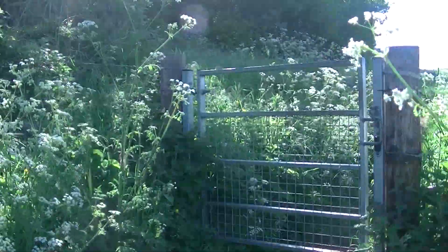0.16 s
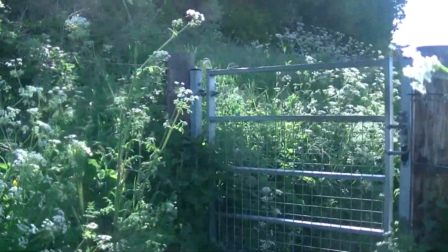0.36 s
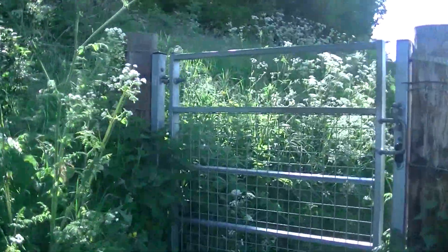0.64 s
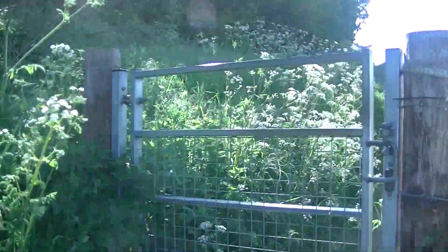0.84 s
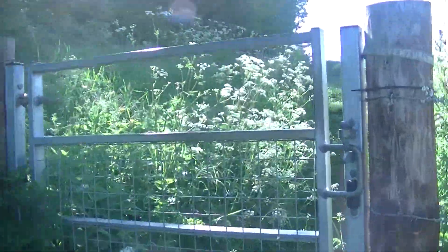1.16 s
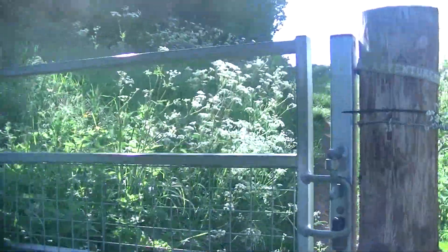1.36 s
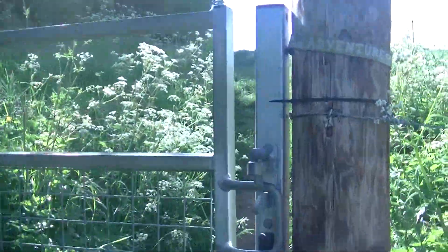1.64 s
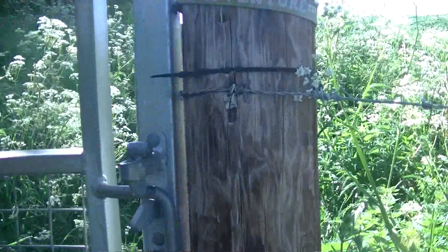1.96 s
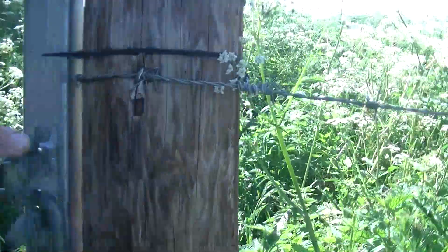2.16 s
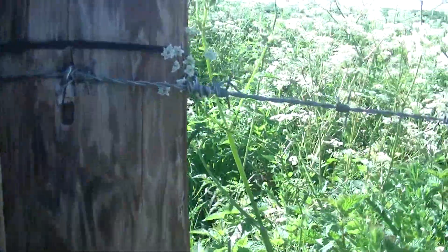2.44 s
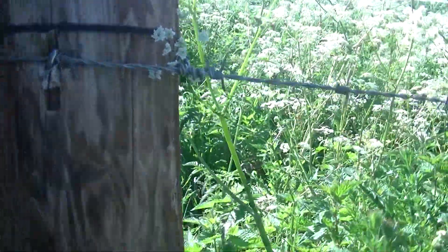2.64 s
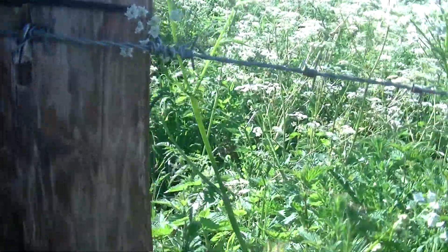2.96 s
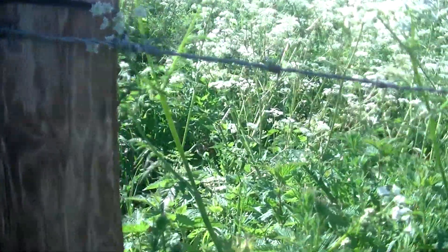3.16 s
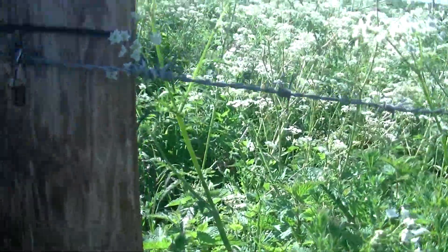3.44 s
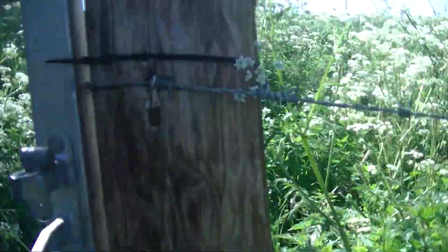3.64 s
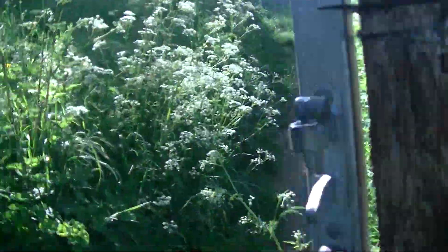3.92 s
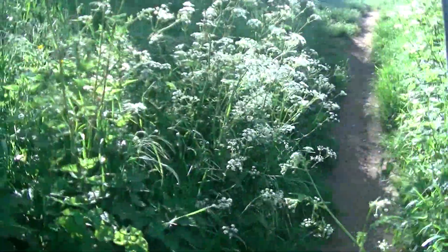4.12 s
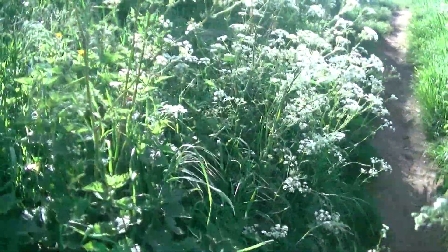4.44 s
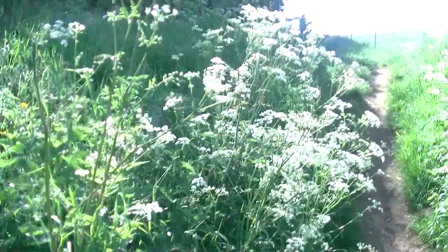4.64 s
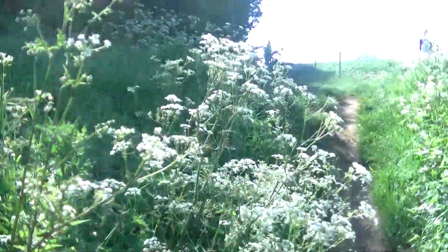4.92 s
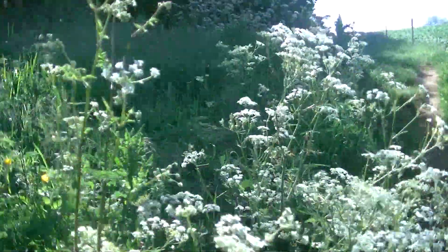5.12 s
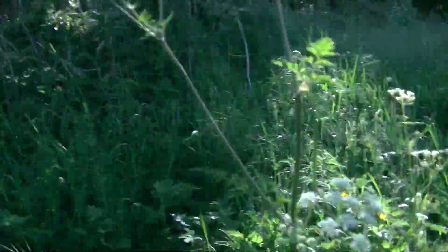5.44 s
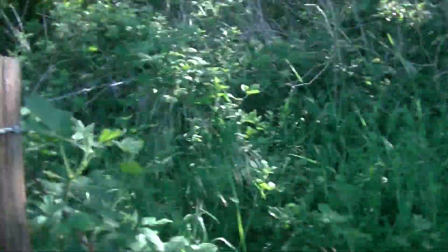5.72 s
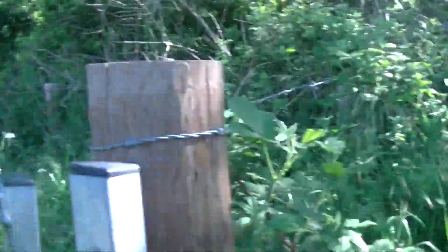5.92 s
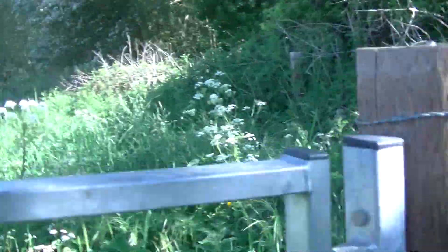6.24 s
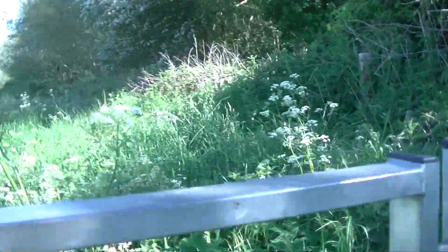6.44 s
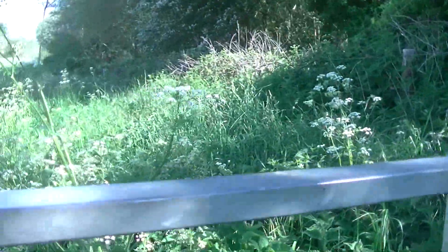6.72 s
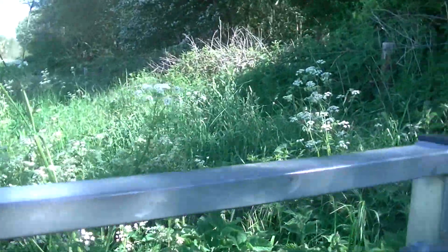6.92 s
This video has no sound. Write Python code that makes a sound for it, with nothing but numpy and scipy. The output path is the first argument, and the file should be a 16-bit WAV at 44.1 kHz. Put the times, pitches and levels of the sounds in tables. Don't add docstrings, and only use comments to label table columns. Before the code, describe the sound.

Open country air hisses softly, heard through a small, bass-thin microphone. From 0 to 2.3 seconds someone walks through tall weeds: grainy swishes with each stride, a few dry snaps around 0.9, brief far chirps from 1.0, a dull step and scuff at 2.1. At 2.34 to 2.44 bright, hard latch clinks strike close by, then lighter chatter around 2.6 and separate clinks at 2.9, 3.1 and 3.3, over blurred distant birdsong. A dense clinking flurry at 3.4 to 3.6 rattles the latch free. Swishing and dragging stalks continue from 3.65, with snaps near 4.8. Birds warble at 5.0 to 5.25, then trill louder at 5.5 to 5.85, echoing off the hedge; a twig cracks at 5.55. A dry hinge rubs at 6.0 to 6.3, heavy step at 6.4. The gate slams at 6.57, rebounds at 6.73 and 6.81, its steel mesh shivering and fading by about 7.1.

```python
import sys
import numpy as np
from scipy import signal
from scipy.fft import rfft, irfft
from scipy.io import wavfile
from scipy.ndimage import uniform_filter1d

SR = 44100
rng = np.random.default_rng(int(sys.argv[2]) if len(sys.argv) > 2 else 0)


def invert_db(level):
    return 10 ** (np.asarray(level, dtype=float) / 20)


def store_pcm(level_fs):
    pcm = np.round(np.clip(level_fs, -1, 1) * 32767).astype(np.int16)
    wavfile.write(sys.argv[1], SR, np.atleast_2d(pcm).T)


N = 312228


def evened(x):
    return x / np.sqrt(np.mean(x ** 2) + 1e-20)


def read(points, hz):
    f, value = np.transpose(points)
    return np.interp(np.log(hz + 1), np.log(f + 1), value)


def add(mix, s, sound):
    part = mix[..., round(s * SR):][..., :sound.shape[-1]]
    part += sound[..., :part.shape[-1]]


def octaves(hz):
    return np.log2(np.maximum(hz, 100) / 4000)


def wander(shape, width):
    return uniform_filter1d(rng.standard_normal(shape), width)


def coloured(x, db_of):
    return irfft(rfft(x) * invert_db(db_of(np.fft.rfftfreq(x.shape[-1], 1 / SR))), x.shape[-1])


def field(x, db_of):
    hz, t, z = signal.stft(x, SR, nperseg=256)
    return signal.istft(z * invert_db(db_of(hz[:, None], t)), SR, nperseg=256)[1][..., :x.shape[-1]]


def grains(per_s, spread_db, dense):
    size = invert_db(spread_db * np.minimum(rng.exponential(1, N), 4)) * (rng.random(N) < per_s / SR)
    return evened(size * rng.standard_normal(N)) + dense * rng.standard_normal(N)


def modes(length, share):
    bins = length // 2 + 1
    picked = (rng.random(bins) < share) * invert_db(3.7 * rng.standard_normal(bins))
    return evened(irfft(picked * np.exp(2j * np.pi * rng.random(bins)), length))


# frequency in Hz, coherence from 0 to 1.
LIKENESS = [(60, 0.135), (240, 0.05), (950, 0.55), (3770, 0.56), (15000, 0.035)]


def pair(x, other):
    same = np.clip(read(LIKENESS, np.fft.rfftfreq(N, 1 / SR)), 0, 1)
    return np.array([x, irfft(same * rfft(x) + np.sqrt(1 - same ** 2) * rfft(other), N)])


# frequency in Hz, left over right in dB.
BALANCE = [(60, 0), (180, 1), (550, 0.5), (1650, 0), (4970, 2.5), (15000, -1)]
# frequency in Hz, left lead in radians.
LEAD = [(0, -1.6), (3700, 0.2), (5170, 0.97), (9390, 1.57), (11300, 1.54), (12900, 0.41), (13900, 1.4),
        (16500, 0.8)]


def nearby(x):
    hz = np.fft.rfftfreq(N, 1 / SR)
    half = invert_db(read(BALANCE, hz) / 2) * np.exp(.5j * read(LEAD, hz))
    direct = irfft(rfft(x) * np.array([half, 1 / half]), N)
    t = np.arange(4410) / SR
    echo = rng.standard_normal((2, len(t))) * invert_db(-60 * t / 0.031) * (t > .0007)
    wet = signal.fftconvolve(x[None], echo / np.linalg.norm(echo[0]), axes=1)[:, :N]
    return direct + invert_db(-8.0) * coloured(wet, lambda f: 2.2 * octaves(f))


# frequency in Hz, density in dB per Hz.
AIR = [(18, -59), (30, -31), (181, -12), (455, -6.5), (1060, -9), (2740, -0.5), (3380, -0.5), (4410, -2.5),
       (11100, -15.5), (14100, -14), (15200, -17), (16500, -42)]


def air():
    patches = uniform_filter1d(rng.standard_normal((129, N // 128 + 2)), 4, 0)
    patches = evened(uniform_filter1d(patches, 20, 1))
    hiss = coloured(pair(*rng.standard_normal((2, N))), lambda hz: read(AIR, hz))
    whine = invert_db(-72.0) * np.sin(2 * np.pi * 7830 * np.arange(N) / SR)
    return invert_db(-55.5) * evened(field(hiss, lambda hz, t: 3.6 * patches[:, :len(t)])) + whine


# time in seconds, level in dB, centre in Hz.
CHORUS = [
    (2.3, -77, 4000),
    (2.55, -56, 3230),
    (2.85, -75, 3700),
    (3.16, -48.5, 3570),
    (3.35, -55, 3420),
    (3.592, -50, 3400),
    (3.9, -76, 3560),
]


def chorus():
    s, db, centre_hz = np.transpose(CHORUS)

    def shape(hz, t):
        off_centre = (hz - np.interp(t, s, centre_hz)) / 900
        return np.interp(t, s, db, -99, -99) + 12.5 - 12 * off_centre ** 2

    return field(rng.standard_normal((2, N)), shape)


# start in seconds, start in Hz, end in Hz, level in dB, length in seconds.
CHIRPS = [(0.987, 1650, 2480, -46, 0.02), (0.996, 2800, 2930, -44.5, 0.012), (1.03, 3130, 3900, -54, 0.025),
          (1.353, 3250, 4160, -51, 0.019), (1.38, 3250, 3000, -49, 0.013), (1.51, 3300, 4500, -49.5, .015),
          (1.535, 3020, 4050, -53, 0.027), (1.811, 2370, 3390, -48.5, .029), (1.84, 3500, 4450, -52, 0.019),
          (1.862, 4460, 4020, -55, .016), (1.945, 3250, 3050, -50, 0.015), (1.959, 2700, 2330, -52, 0.013),
          (1.997, 4150, 4250, -48, 0.013), (2.031, 3820, 4130, -53, .018), (2.05, 2890, 3260, -51, 0.024),
          (2.24, 3620, 4100, -52, .014), (3.27, 3550, 3300, -49, 0.032), (4.031, 2930, 2993, -46.5, 0.068),
          (4.04, 3620, 3820, -43, 0.018), (4.062, 4250, 3970, -46, .03), (4.1, 3900, 4620, -48, 0.022),
          (4.123, 4700, 3900, -50, 0.014), (4.707, 5700, 6550, -50, .029), (4.972, 5700, 6700, -50, 0.03),
          (5.213, 6700, 6830, -51, .025), (5.487, 4700, 5220, -44, .029), (5.842, 4400, 4400, -44.5, 0.031)]
# time of the top in seconds, top in Hz, level in dB, high voice in Hz, its level in dB.
WARBLE = [
    (4.99, 5450, -41.5, 6680, -48),
    (5.125, 5390, -45.5, 6960, -49),
    (5.244, 5770, -48, 6790, -49.5),
]
# start in seconds, low note in Hz, level in dB, upper note in Hz, its level in dB.
TRILL = [
    (5.507, 4490, -34.5, 4880, -50),
    (5.604, 4480, -38, 5080, -44),
    (5.692, 4520, -37, 4920, -45),
    (5.816, 4520, -38.5, 4740, -50),
]


def notes():
    rows = [(s, length, a_hz, b_hz, db) for s, a_hz, b_hz, db, length in CHIRPS]
    flick_s, high_s, sag_hz = 0.025, 0.037, 60.6
    for s, hz, db, high_hz, high_db in WARBLE:
        rows.append((s - flick_s, flick_s, hz - 347, hz, db - 2))
        rows.append((s, .04, hz, hz - 970, db))
        rows.append((s - flick_s / 2, high_s, high_hz, high_hz - 450, high_db))
    for s, hz, db, high_hz, high_db in TRILL:
        rows.append((s, 0.026, hz + sag_hz, hz - sag_hz, db))
        rows.append((s, 0.076, high_hz + sag_hz, high_hz - sag_hz, high_db))
    return rows


def birds():
    calls = np.zeros(N)
    for s, length, start_hz, end_hz, db in notes():
        u = np.linspace(0, 1, round(length * SR))
        hz = (start_hz + (end_hz - start_hz) * u) * (1 + 0.2 * wander(4410, 90)[:len(u)])
        whistle = np.sin(2 * np.pi * np.cumsum(hz) / SR)
        add(calls, s, invert_db(db - 1.5) * np.sin(np.pi * u) ** 0.22 * whistle)
    t = np.arange(SR // 2) / SR
    hedge = rng.standard_normal((2, len(t))) * invert_db(-60 * t / 0.85) * (t > .008)
    echoes = signal.fftconvolve(calls[None], hedge / np.linalg.norm(hedge[0]), axes=1)[:, :N]
    return invert_db(2.5) * calls + invert_db(0.5) * echoes


# frequency in Hz, density in dB per Hz.
WEEDS = [(35, -69), (60, -39), (412, -6.5), (1080, -15), (2190, 0.5), (4030, -4.5), (7250, -8.5),
         (9170, -17), (14000, -16.5), (15400, -22), (16500, -31.5)]
# start in seconds, end in seconds, level in dB.
WALKING = [
    (0, 2.6, -58.5),
    (3.63, 3.95, -53.5),
    (3.951, 5.68, -52.5),
    (5.68, 7.2, -58),
]
# time in seconds, peak in dB.
STRIDES = [(.21, -49), (.46, -43.5), (.53, -49.5), (.75, -48.5), (1.0, -44.5), (1.2, -48.5), (1.3, -47.5),
           (1.55, -51.5), (1.74, -57), (1.84, -54), (2.191, -61), (2.271, -47.5), (4.99, -49.5),
           (5.46, -51), (5.6, -44)]


def walk():
    swish = pair(grains(2500, 2.7, 1.0), grains(2500, 1.9, 0.51))
    swish = evened(coloured(swish, lambda hz: read(WEEDS, hz)))

    def shape(hz, t):
        power = sum(invert_db(2 * db) * ((t >= a) & (t < b)) for a, b, db in WALKING) + 1e-12
        for s, db in STRIDES:
            db_per_s = np.where(t < s, 139, 197)
            power = power + invert_db(2 * (db - db_per_s * abs(t - s)))
        return 10 * np.log10(power)

    return field(swish, shape)


def snap(db, hz, length):
    t = np.arange(2048) / SR
    burst = coloured(rng.standard_normal(len(t)),
                     lambda f: np.where(f < hz, -16., -8.) * np.log2((f + 5) / hz) ** 2)
    return invert_db(db - 6.5 - 20 * t / length) * evened(burst) * np.minimum(t * hz / 0.98, 1)


def scuff(length, db, hz, treble_db):
    def colour(f):
        hump = np.where(f < hz, -3.5, -5.5) * np.log2((f + 50) / hz) ** 2
        return np.maximum(hump, treble_db - 40 * (f < 250))

    grit = evened(coloured(grains(2000, 2.8, 1.0)[:8192], colour))
    grit = grit * invert_db(27 * wander(8192, 300))
    n = round(length * SR)
    return invert_db(db) * grit[:n] * signal.windows.tukey(n, .2)


# time in seconds, peak in dB, colour in Hz.
SNAPS = [(0.369, -37.5, 3620), (0.73, -35.5, 1600), (0.87, -27, 3500), (0.891, -34, 3450),
         (0.921, -29, 3630), (0.959, -35, 4000), (1.187, -33.5, 2410), (3.739, -36.5, 2470),
         (4.022, -31, 2270), (4.971, -33, 5000), (4.302, -41, 2580), (4.8, -30, 3600), (1.668, -40, 3650),
         (2.135, -28.5, 7060), (2.178, -41.5, 7040), (6.389, -29, 1940), (6.412, -29, 2380),
         (6.421, -20.5, 2170), (6.445, -32, 2500), (4.755, -33, 3960), (4.868, -37, 4300),
         (6.518, -38.5, 3480), (6.537, -41, 3170)]
# time in seconds, peak in dB, colour in Hz, length in seconds.
TWIG = [
    (5.55, -14.5, 2500, 0.0053),
    (5.552, -21, 6800, 0.0045),
]
# time in seconds, peak in dB, colour in Hz.
THUDS = [
    (.687, -44, 450),
    (.96, -48, 140),
    (1.125, -39, 455),
    (4.972, -36.5, 340),
    (5.549, -31, 650),
    (5.83, -45.5, 450),
    (2.128, -33, 404),
    (6.404, -28, 440),
]
# start in seconds, length in seconds, level in dB, colour in Hz, treble in dB.
SCUFFS = [(0.909, 0.03, -47, 3600, -11), (1.665, 0.054, -44, 2170, -17), (2.127, 0.033, -35.5, 2510, -12.5),
          (2.156, 0.017, -48, 2600, -17), (4.021, 0.1, -53, 3520, -27), (4.291, 0.056, -42, 2780, -13),
          (4.478, 0.051, -44.5, 3330, -21), (4.736, 0.15, -39.5, 3600, -15),
          (5.027, 0.051, -50.5, 2070, -16), (5.148, 0.11, -50, 2110, -20), (5.358, 0.061, -44, 3600, -12),
          (6.381, 0.075, -34.5, 2630, -16)]


def footing():
    ground = np.zeros(N)
    for s, db, hz in SNAPS:
        add(ground, s, snap(db, hz, 0.024))
    for s, *row in TWIG:
        add(ground, s, snap(*row))
    for s, db, hz in THUDS:
        add(ground, s, snap(db, hz, 6.5 / hz))
    for s, *row in SCUFFS:
        add(ground, s, scuff(*row))
    return ground


# time in seconds, level in dB.
SWING = [
    (5.949, -67.5),
    (6.101, -36),
    (6.228, -37.5),
    (6.33, -73),
]
# frequency in Hz, width in Hz, level in dB.
HINGE = [(2880, 180, -8), (7500, 34, 3), (9230, 39, -7), (11200, 32, -11), (13100, 35, -4), (14100, 55, -9),
         (15300, 34, -6)]
# frequency in Hz, density in dB per Hz.
GRIT = [(590, -61), (1000, -68), (2710, -5.5), (4700, -12), (12300, -8.5), (15600, -22), (16500, -31)]


def hinge():
    s, db = np.transpose(SWING)
    t = np.arange(s[0], s[-1], 1 / SR)
    hz = np.fft.rfftfreq(len(t), 1 / SR)
    peaks = sum(invert_db(d) / (1 + 2j * (hz - f) / (2.0 * w)) for f, w, d in HINGE)
    rub = irfft(rfft(grains(4800, 1.1, 1.3)[:len(t)]) * (peaks + invert_db(-1.5 + read(GRIT, hz))), len(t))
    return s[0], invert_db(np.interp(t, s, db) - 1.0) * evened(rub) * signal.windows.tukey(len(t), .2)


# time in seconds, level in dB, brightness in dB per octave.
RATTLE = [
    [(2.62, -38, -3), (2.646, -43, 0), (2.69, -39, 3)],
    [(3.5, -31, 23), (3.614, -25, -5.5), (3.66, -59, -12)],
]


def rattle(rows):
    s, db, bright_db = np.transpose(rows)
    length = round((s[-1] - s[0]) * SR)
    drive = 0.86 * grains(930, 1.8, 1.4)[:length] + modes(length, 0.16)
    body = evened(coloured(drive, lambda hz: read(CRACK, hz))) * signal.windows.tukey(length, .05)

    def shape(hz, t):
        tilt = np.interp(t + s[0], s, bright_db - 4.5)
        return np.interp(t + s[0], s, db - 6.0) + tilt * octaves(hz)

    return s[0], field(body, shape)


# start in seconds, caught in seconds, low mode at start in dB,
# low mode at catch in dB, upper modes in dB.
FREE = [
    (3.374, 3.392, -8, -35, -24.5),
    (3.414, 3.49, -22.5, -13, -32.5),
    (3.497, 3.585, -29, -23.5, -21.5),
    (6.749, 6.878, -29.5, -40, -45),
]
# frequency in Hz, level in dB, T60 in seconds, heard from in seconds.
UPPER = [(11333, 0, .35, 0), (13887, -8, .6, 3.45), (15335, -5, 1.0, 0)]


def free_bar(start, caught, low_db, caught_db, upper_db):
    catch_t60, free = 0.11, caught - start
    t = np.arange(0, free + catch_t60, 1 / SR)
    lines = invert_db(low_db + (caught_db - low_db) * np.minimum(t / free, 1)) * np.sin(2 * np.pi * 6607 * t)
    knock = min(row[0] for row in CLINKS + SLAMS if row[0] > caught) - start
    lines = lines * invert_db(-60 * np.maximum(t - knock, 0) / 0.029)
    for hz, db, t60, from_s in UPPER:
        if start > from_s:
            lines = lines + invert_db(upper_db + db - 60 * t / t60) * np.sin(2 * np.pi * hz * t)
    damped = lines * invert_db(-60 * np.maximum(t - free, 0) / catch_t60)
    return start, np.sqrt(2) * damped * np.minimum(t / 0.0013, 1)


# time in seconds, mesh in dB, brightness in dB per octave, tubes in dB.
SHIVER = [
    (6.5681, -11.5, -0.5, -5),
    (6.62, -15.5, 0.5, 1.5),
    (6.71, -14, -2, -8),
    (6.761, -18.5, -0.5, -13),
    (6.85, -23.5, -3.5, 0),
    (6.93, -33, -7, -11),
    (7.08, -45, -11.5, -1),
]
# frequency in Hz, density in dB per Hz.
MESH = [(35, -82), (60, -86), (326, -34), (393, -51), (983, -31.5), (1470, -26.5), (2350, -16.5),
        (3040, -1.5), (4640, -18), (4980, -10), (12700, -29.5), (14700, -29), (16500, -69)]
# frequency in Hz, level in dB.
TUBES = [(2708, -37), (2853, -34), (2977, -25), (3031, -28), (3085, -31), (3171, -31), (3644, -37),
         (3898, -37), (4016, -37), (4188, -43), (4888, -36), (5125, -42), (5787, -48), (6218, -46),
         (7154, -45), (7520, -49)]
# frequency in Hz, level in dB.
RAILS = [(1981, -55), (2277, -52), (2509, -56), (2616, -48), (3025, -50), (3978, -59), (4888, -58),
         (5421, -53), (5669, -61), (6632, -61)]


def shiver():
    s, mesh_db, bright_db, tubes_db = np.transpose(SHIVER)
    t = np.arange(s[0], N / SR, 1 / SR)
    wavering = invert_db(18 * uniform_filter1d(wander(len(t), 300), 300))
    mesh = (modes(len(t), 0.13) + 0.55 * grains(1500, 1.2, 0.61)[:len(t)]) * wavering
    mesh = evened(coloured(mesh, lambda hz: read(MESH, hz)))

    def shape(hz, u):
        return np.interp(u + s[0], s, mesh_db - 4.5) + np.interp(u + s[0], s, bright_db) * octaves(hz)

    out = field(mesh, shape)
    tubes_lift_db = np.interp(t, s, tubes_db) + 17.0
    rails_lift_db = np.where(t < 6.729, 21, 33)
    for lines, lift_db in (TUBES, tubes_lift_db), (RAILS, rails_lift_db):
        hz, db = np.transpose(lines)[:, :, None]
        db = db + 110 * wander((len(hz), len(t)), 1200)
        tones = invert_db(db + 2.0) * np.sin(2 * np.pi * (hz * t + rng.random(hz.shape)))
        out = out + tones.sum(0) * invert_db(np.interp(t, s, mesh_db) + lift_db)
    return s[0], out * np.minimum((t - s[0]) / 0.0016, 1)


def ring(hz, db, t60, free):
    t = np.arange(0, min(free + .07, .4), 1 / SR)
    decay_db = db - 60 * t / t60 - 60 * np.maximum(t - free, 0) / .07
    decay_db = decay_db + 40 * wander((len(hz), 4420), 75).repeat(4, 1)[:, :len(t)]
    tones = invert_db(decay_db) * np.sin(2 * np.pi * (hz * t + rng.random(hz.shape)))
    return tones.sum(0) * np.minimum(t / 0.0016, 1)


# frequency in Hz, level in dB, T60 in seconds.
BAR = [(6580, 3, 0.038), (8460, -3, 0.042), (10600, -14, 0.069), (11900, -32, 0.1), (12100, -19, 0.099),
       (15100, -15, 0.09)]
KEEPER = [(1561, -13.5, 0.071), (2735, -0.5, 0.13), (2870, -17, 0.13), (2925, -4.5, 0.044),
          (4355, -15, 0.057), (5260, -9.5, 0.051), (6400, -6, 0.06)]
FRAME = [(976, -24, 0.35), (1560, -9, 0.27), (2008, -1.5, 0.19), (2283, -6.5, 0.3), (3230, -5, 0.33),
         (3300, -4.5, 0.38), (4130, -16, 0.23), (5331, 2.5, 0.25)]
PLATE = [(2720, -15, 0.26), (2980, -8.5, 0.23), (3045, -9, 0.17), (3225, -13, 0.097), (3830, -15, 0.066),
         (3846, -16, 0.14), (4040, -3.5, 0.092), (4215, -1, 0.059), (4340, 1.5, 0.04), (5000, -9, 0.11),
         (5120, -2, 0.11)]
# time in seconds, then bar, keeper, frame and plate in dB.
STRIKES = [(2.344, -16, -38, -27, -23), (2.361, -24, -20.5, -35, -28.5), (2.391, -48, -26, -54, -39),
           (2.438, -36, -37, -42.5, -25.5), (2.696, -63, -26.5, -45, -53), (2.94, -51, -25, -58, -40),
           (3.117, -23.5, -46, -43, -24.5), (3.317, -42, -23.5, -55, -35), (3.374, -28, -52, -33, -22.5),
           (3.4, -13, -35, -28.5, -24), (3.494, -18.5, -40, -24, -28), (3.541, -24, -51, -25.5, -38),
           (6.729, -47, -49, -27, -26), (6.851, -60, -59.5, -35, -48), (6.91, -60, -62, -39.5, -46)]
SETTLES_S = [3.62, 6.95]
# time in seconds, frequency in Hz, level in dB, T60 in seconds.
LINGER = [(2.621, 1478, -41, 0.28), (2.62, 3020, -40, 0.26), (2.654, 6800, -31.5, .05),
          (2.439, 3225, -16, 0.056), (2.44, 1456, -38.5, .14), (2.45, 2062, -33, .07),
          (2.441, 5160, -37, 0.15), (2.44, 6480, -25, 0.056), (2.532, 2020, -46, 0.07),
          (2.94, 1561, -36, .14), (3.119, 1561, -38, 0.15), (3.118, 2283, -40, 0.11),
          (3.317, 3430, -38, .1), (3.317, 4355, -14.5, 0.049), (3.401, 1946, -31.5, .3),
          (3.401, 4000, -39, .5), (3.405, 885, -49, .15), (3.408, 3386, -19, .09), (3.541, 10300, -33, 0.2),
          (3.585, 3323, -32, 0.21), (3.64, 3290, -47.5, 0.55), (2.364, 2887, -18.5, 0.059),
          (2.696, 2690, -19, 0.043), (3.691, 2870, -46, 0.17), (6.57, 4900, -27.5, 0.36),
          (6.57, 5640, -26, .12), (6.57, 9500, -21.5, 0.16), (6.611, 2990, -17, 0.2),
          (6.612, 3160, -16, 0.27), (6.6, 1340, -38.5, .77), (6.64, 987, -44.5, 1.3),
          (6.599, 332.6, -59.5, 2.1), (6.739, 5320, -28, 0.34), (6.601, 1604, -44, 1.2),
          (6.6, 1960, -38, 1.2), (6.6, 2220, -46, 0.89), (3.1187, 6580, -17, 0.026),
          (6.73, 5150, -18, 0.082), (6.73, 870, -47, 0.42), (6.73, 593, -48, 0.38), (6.74, 2283, -28, 0.2),
          (6.74, 1950, -40, 0.48), (6.741, 1583, -45, 0.13), (6.765, 6480, -22, 0.068),
          (6.812, 3140, -13, 0.061), (6.85, 2090, -26, 0.077), (6.885, 2130, -29, 0.056),
          (6.911, 2030, -31, 0.1), (6.911, 5400, -29, 0.079)]


def rings():
    out, contacts = np.zeros(N), np.append(np.transpose(STRIKES)[0], SETTLES_S)
    hz, db, t60 = np.transpose(BAR + KEEPER + FRAME + PLATE)[:, :, None]
    part = np.repeat(np.arange(4), [len(BAR), len(KEEPER), len(FRAME), len(PLATE)])
    for s, *levels_db in STRIKES:
        held = 0.52 if s < 3.45 else 1
        lasts = t60 * np.array([1, 1, held, 1])[part, None]
        struck_db = db + np.array(levels_db)[part, None] + 3.5 * rng.standard_normal(hz.shape)
        add(out, s, ring(hz, struck_db, lasts, contacts[contacts > s].min() - s))
    for s, f, level_db, lasts in LINGER:
        add(out, s, ring(np.array([[f]]), level_db, lasts, lasts / 2))
    return out


# frequency in Hz, density in dB per Hz.
CRACK = [(35, -59.5), (60, -95), (1190, -34), (2040, -5.5), (2400, -8), (3260, 3), (5870, -10), (6450, 1),
         (8960, -16), (10800, -9), (13000, -30), (15400, -20), (16500, -49)]


def blow(db, smear_db, t60, bright_db):
    def dull(hz):
        return read(CRACK, hz) + min(bright_db, 0) * octaves(hz) - 9 * np.maximum(octaves(hz), 0)

    t = np.arange(8192) / SR
    tick = coloured(rng.standard_normal(len(t)), lambda hz: read(CRACK, hz) + bright_db * octaves(hz))
    smear = invert_db(smear_db - 60 * t / t60) * evened(coloured(modes(len(t), 0.12), dull))
    spray = invert_db(smear_db - 0.5 - 60 * t / (0.11 * t60))
    sharp = (invert_db(-6.0 - 60 * t / 0.012) + spray) * evened(tick)
    return invert_db(db) * (sharp + smear) * np.minimum(t / 0.00036, 1)


# time in seconds, peak in dB, smear in dB, smear T60 in seconds, brightness in dB per octave.
CLINKS = [(2.3425, -4, -11, 0.076, 6), (2.362, -6.5, -5.5, 0.023, -4), (2.3904, -18, -6, 0.039, -7),
          (2.4385, 1, -18.5, 0.064, 8), (2.6226, -27, -12.5, 0.11, -7.5), (2.6541, -36, -5.5, 0.36, -3),
          (2.6952, -22.5, 1, 0.034, -11.5), (2.8985, -31, -3.5, 0.064, -12.5),
          (2.941, -17, -5.5, 0.045, -14), (3.117, 2, -19.5, 0.094, 3), (3.316, -8.5, -7.5, 0.043, -8.5),
          (3.374, -9, -13, 0.044, 10), (3.3962, -8, -6, 0.035, 7), (3.3999, -2, -10.5, 0.047, 2),
          (3.4059, -6, -5, 0.044, 1), (3.41, -11, -8.5, 0.06, -1), (3.4947, -2.5, -8.5, 0.048, 13),
          (3.522, -15, -12, 0.05, -8), (3.54, -10.5, -10.5, 0.11, -4), (3.554, -16, -9, 0.05, -5),
          (3.583, -16, -8, 0.05, -4), (2.481, -33, -9, 0.05, -11), (2.561, -36.5, -9, 0.057, -14),
          (2.736, -36.5, -6, 0.04, -6)]
SLAMS = [(6.5683, 2, -8, 0.034, 5.5), (6.612, -14, -25, 0.074, 10), (6.6172, -17, -29, 0.05, -6),
         (6.6215, -19, -30, 0.05, 0), (6.628, -12, -13, 0.056, -8), (6.6573, -11, -20, 0.05, -6),
         (6.659, -18, -8, 0.24, -3), (6.725, -2, -11, 0.032, 0.5), (6.7285, -1.5, -10.5, 0.048, -2),
         (6.813, -6, -13.5, 0.054, -2), (6.8523, -19, -29, 0.052, -9), (6.91, -20.5, -10, 0.19, -4.5)]


def gate():
    steel = np.zeros(N)
    for s, *row in CLINKS + SLAMS:
        add(steel, s, blow(*row))
    for row in FREE:
        add(steel, *free_bar(*row))
    for rows in RATTLE:
        add(steel, *rattle(rows))
    add(steel, *shiver())
    add(steel, *hinge())
    steel = signal.lfilter(*signal.butter(3, 800, "high", fs=SR), steel)
    return steel + signal.lfilter(*signal.butter(2, 400, "high", fs=SR), rings())


def scene():
    return air() + chorus() + birds() + walk() + nearby(footing() + gate())


def top_cut(x):
    return signal.sosfilt(signal.butter(12, 16840, fs=SR, output="sos"), x)


def record(dry):
    squash = 1.076 * np.tanh(dry / 1.13) - dry
    squash = signal.lfilter(*signal.butter(2, 700, "high", fs=SR), squash)
    edge = signal.firwin(255, 16000, window=("kaiser", 8), fs=SR)[None]
    mix = signal.oaconvolve(dry + squash, edge, "same")
    return top_cut(mix)


dry = scene()
out = record(dry)
store_pcm(out)
```